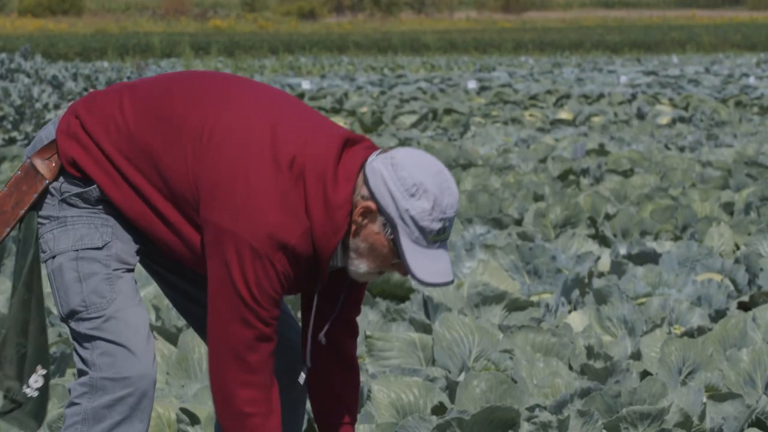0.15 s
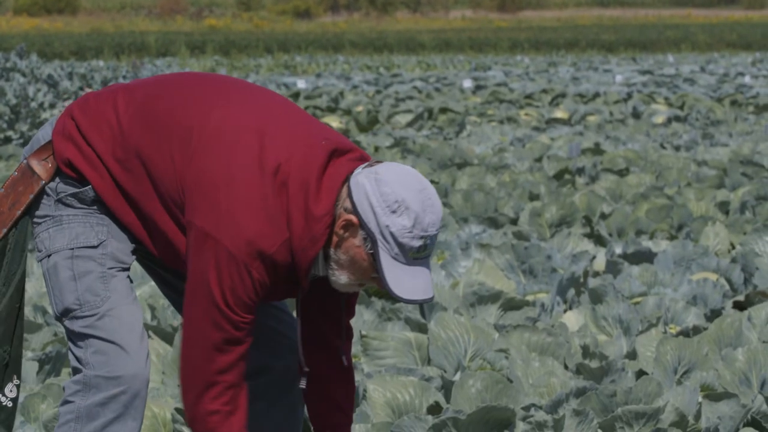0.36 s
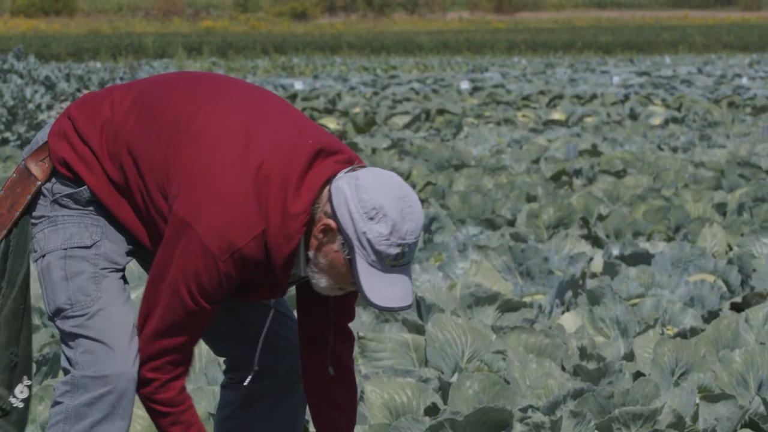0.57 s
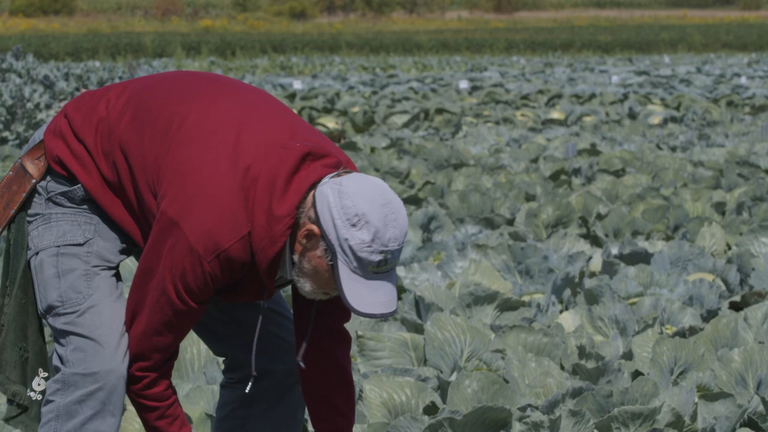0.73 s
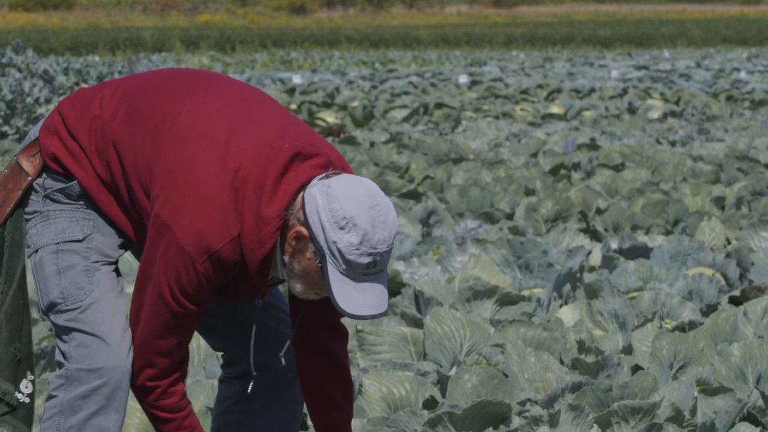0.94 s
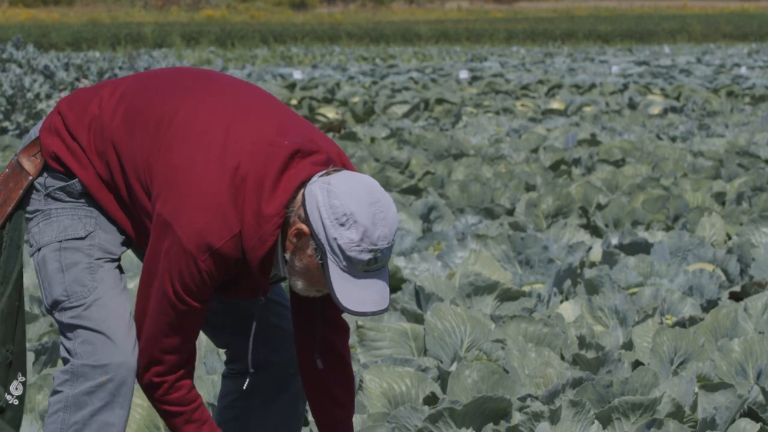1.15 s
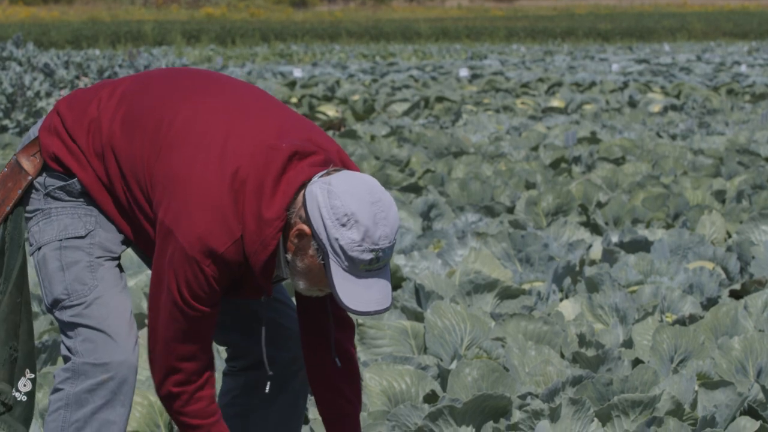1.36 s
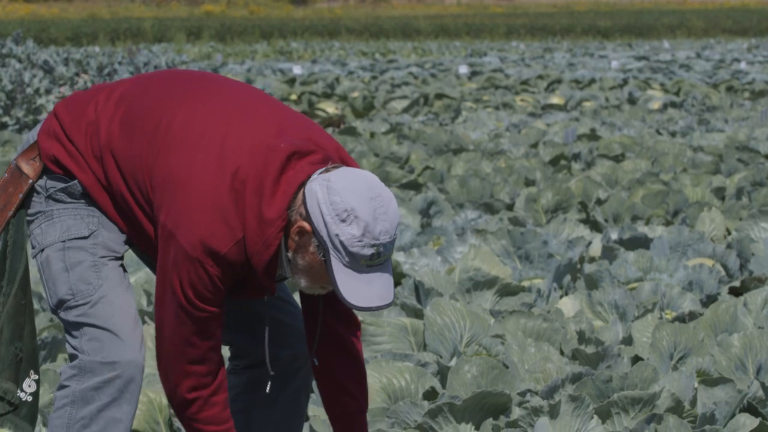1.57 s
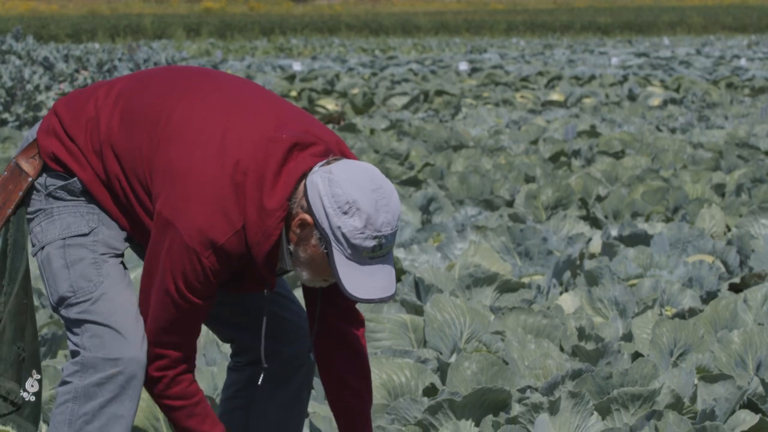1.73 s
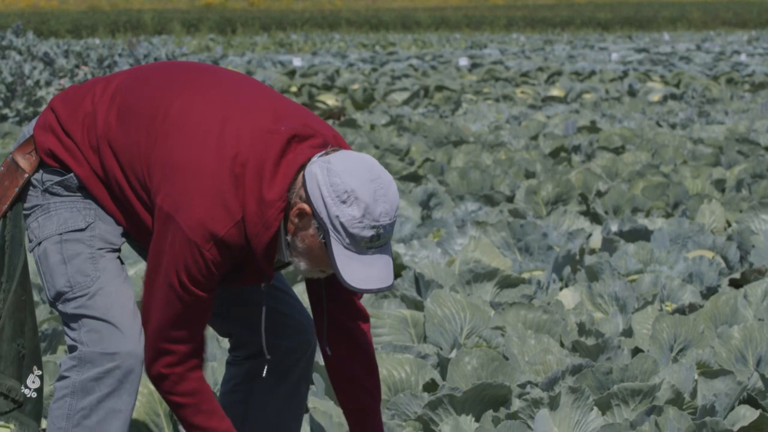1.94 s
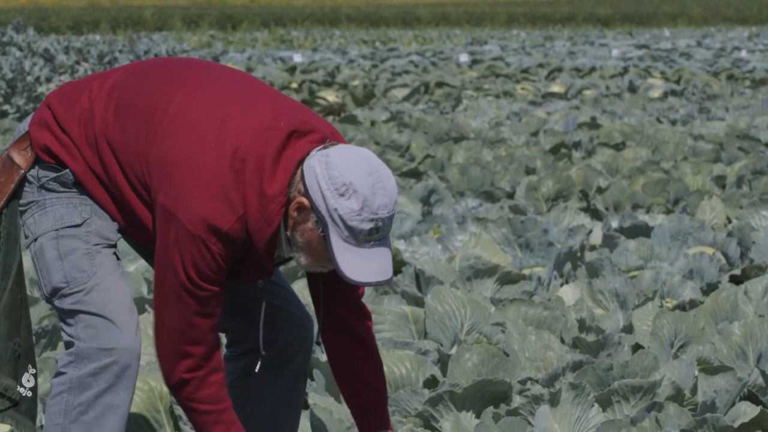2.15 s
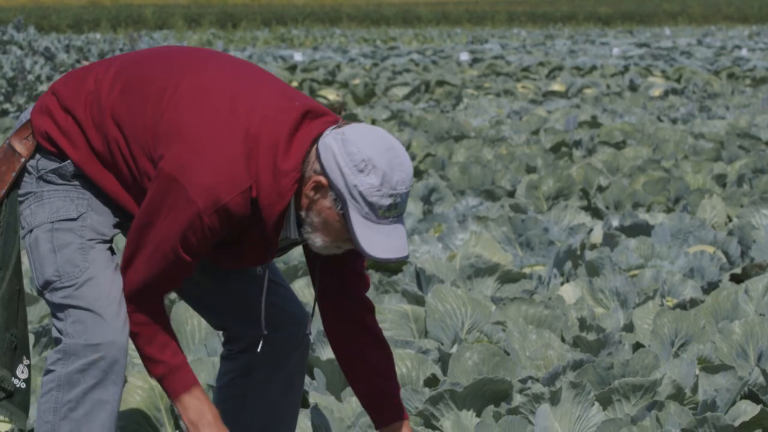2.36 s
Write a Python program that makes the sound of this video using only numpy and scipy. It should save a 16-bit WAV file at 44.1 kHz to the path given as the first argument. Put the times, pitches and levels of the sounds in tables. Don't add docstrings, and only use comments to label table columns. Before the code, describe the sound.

Crisp cabbage leaves crunch and tear, a stalk cracks early, then more sharp leafy snaps follow

```python
import sys
import numpy as np
from scipy import signal
from scipy.fft import rfft, irfft, next_fast_len
from scipy.io import wavfile
from scipy.ndimage import uniform_filter1d

SR = 44100
rng = np.random.default_rng(int(sys.argv[2]) if len(sys.argv) > 2 else 0)


def dump(signal):
    limited = np.clip(np.atleast_2d(signal).T, -1, 1)
    pcm = np.round(limited * 32767).astype(np.int16)
    wavfile.write(sys.argv[1], SR, pcm)


def level_to_linear(level):
    exponent = np.asarray(level, float) / 20
    return 10 ** exponent


N = 105840

# time_s, effort_db, hollow_db, fizz_db
RUB_MOVES = [(0, -56.5, 1.5, -5.5), (.1, -67, 1.5, -24), (0.174, -52.5, 5, -2.5), (.33, -52, 6.5, 0.5),
             (.44, -57, 6, -5), (0.538, -53, -1.5, -8.5), (.595, -59, -3.5, -1.5), (.65, -54.5, -9.5, -9),
             (.84, -58.5, -2, -7), (.92, -78, 4.5, -3), (1.19, -76.5, -1, -5.5), (1.33, -48, -6.5, -7),
             (1.5, -61, -3, -3), (1.66, -52, 0.5, -2), (1.81, -73.5, 6, -6.5), (1.97, -58, -1, -0.5),
             (2.2, -57, 5.5, -2.5), (2.4, -62.5, 4.5, -1.5)]
# start_s, length_s, first_db, last_db, hollow_db
LEAF_TEARS = [(0.11, 0.05, -63, -73, 14.5), (0.176, 0.081, -57, -49.5, 13.5), (0.281, 0.027, -41, -52, 8.5),
              (0.476, 0.087, -55.5, -60, -5), (0.64, 0.018, -53, -53, 0), (0.935, 0.011, -61, -56.5, -9.5),
              (1.001, 0.025, -65.5, -62.5, -19), (1.035, 0.018, -63, -67, -15),
              (1.128, 0.012, -58, -62.5, -2.5), (1.255, 0.055, -56, -56.5, -5),
              (1.313, 0.019, -52.5, -48, -3), (1.334, 0.027, -49, -57, -1), (1.379, .02, -57, -59, -1.5),
              (1.501, 0.057, -59, -51.5, -7.5), (1.558, 0.039, -49, -42.5, 3), (1.6, 0.013, -39, -43.5, 6),
              (1.62, 0.011, -44.5, -42.5, 7), (1.742, 0.032, -52, -59, -3.5), (1.82, 0.045, -49, -42, -4.5),
              (1.853, 0.031, -46, -46, -11), (1.882, 0.039, -49, -54.5, 5), (1.928, 0.029, -51.5, -50, 4.5),
              (1.097, .012, -69, -68, -4), (0.772, 0.029, -62, -59, -3.5),
              (2.087, 0.029, -50.5, -58.5, -13), (2.11, 0.0078, -51, -43.5, -11),
              (2.12, 0.0074, -42.5, -46, -4), (2.144, 0.006, -52, -46, 0), (2.132, 0.0098, -39.5, -41, 6),
              (2.161, 0.052, -48, -65.5, 11.5), (2.22, 0.025, -52, -68, 8)]
# start_s, peak_db, hollow_db, fizz_db, blade_hz
LEAF_SNAPS = [(0.1141, -42, 17.5, 1.5, 2320), (0.1933, -26, 5.5, -0.5, 2300), (0.202, -25, 10.5, -8, 2610),
              (0.2225, -37.5, 12.5, -3, 2320), (.2432, -13.5, 2, -2, 2180), (0.3431, -29, 4, -11, 2350),
              (0.536, -29, -23, -14, 2170), (0.61, -31.5, -5.5, -11, 1730), (0.689, -55, -12, -10, 1720),
              (.7555, -28, -10.5, -8.5, 2000), (0.9358, -34, -13.5, -5, 3450),
              (1.3194, -37.5, -1, -11, 1695), (1.5628, -24.5, -4, -10, 1710), (1.6, -30, 12.5, -4, 2620),
              (1.62, -19.5, -0.5, 5, 2490), (1.754, -30.5, 1.5, -6, 2150), (1.8228, -37, 2.5, -3, 1860),
              (1.8549, -18.5, -13, -14, 1890), (1.8662, -16.5, -5, -3, 1930), (1.8803, -28, 5, 13, 2210),
              (1.9279, -27, -1, -2, 1860), (1.9499, -16.5, -4, 3.5, 2290), (2.1567, -16.5, -1, 0, 1670),
              (2.2231, -35.5, 15.5, 11, 2010),
              (0.388, -41.5, 16, -12, 2290), (0.7074, -45, -15, 4, 2070), (.817, -53, -1.5, -10, 1990),
              (0.9926, -42.5, -16, 1.5, 1705), (1.014, -40.5, -17, 4, 3730), (1.13, -43, -3.5, -11, 1780),
              (1.1814, -44, -15, -10, 1780), (1.4604, -33, -11, -10, 1790), (1.6289, -30, 0, 3, 1880),
              (1.6934, -42, -9, 10.5, 2000), (1.996, -41, 4, 6.5, 2900), (2.0408, -37, -22, -1, 2080),
              (2.112, -23, -5, 5.5, 4550), (2.1346, -27, -17, -10, 1920), (1.149, -46, -5, -3, 2000)]
# start_s, peak_db, hollow_db, fizz_db, blade_hz
MORE_SNAPS = [(.214, -33, 4, -6, 2500), (.293, -26, -8, -4, 2600), (.421, -41, 12, -8, 2300),
              (.83, -45, -5, -6, 2300), (.949, -39, -14.5, -2, 3500), (1.104, -48.5, -7, -8, 1775),
              (1.215, -43.5, -7.5, -9, 1800), (1.276, -37, -3, 1, 1700), (1.336, -28, -5, -6, 1810),
              (1.36, -40, -8, -4, 2000), (1.386, -37, -1, -3, 2060), (1.503, -49, -8, 8, 2000),
              (1.536, -34, -6, 3, 2400), (1.594, -26, -8, 2, 2540), (1.608, -30, 3, 7, 2200),
              (1.674, -38.5, -2, 1, 2000), (1.834, -32.5, -3, 2, 2000), (1.875, -35, -8, 9, 2000),
              (1.912, -34, -4, 6, 2300), (2.094, -32.5, -13, 0, 2000), (2.12, -29.5, -12, 11, 4530),
              (2.136, -22.5, 11.5, 1, 2080), (2.205, -40, 0, 2, 2000), (.318, -42, 7, -6, 2300),
              (.366, -48, 8, -8, 2300), (.455, -44, 6, 2, 2200), (.505, -42, 7, 1, 1900),
              (.575, -44, -4, -3, 2000), (.795, -43, -7, 6, 3450), (.941, -38, -14, 3, 3300),
              (.953, -42, -14, 0, 3650), (1.647, -40, 2, -1, 2000), (1.788, -53, -3, 5, 2000),
              (1.108, -47, -10, -12, 3700)]
# pitch_hz, level_db, t60_s
HEAD_MODES = [(212, -19.5, 0.071), (335, -9, 0.052), (433, -6.5, 0.065), (556, 1, 0.037), (706, -5, 0.039),
              (896, -14.5, 0.041), (1072, -13.5, 0.034), (2000, -16, 0.0051), (2494, -6, 0.02),
              (3300, -3, 0.01), (4300, -9.5, .005)]
# start_s, length_s, pitch_hz, level_db
THIN_TONES = [
    (.665, .032, 6700, -69),
    (.785, .025, 3420, -56),
    (.775, .153, 13400, -78),
    (.865, .066, 6700, -78),
    (.775, .045, 8080, -75),
    (.934, .024, 3480, -59),
    (.936, .025, 13400, -72),
]
# pitch_hz, level_db
FIZZ_COLOUR = [(800, -16), (1400, 6.5), (2500, 3), (5000, -2), (8000, -1.5), (12000, -0.5), (15500, -4.5),
               (16000, -34)]
# pitch_hz, level_db
AIR_COLOUR = [(60, -23.5), (200, -16), (500, -1), (1100, -19), (1900, -9), (3500, -18.5), (13000, -26),
              (16000, -35.5)]

BREAK_LEN = 2048
TICK_S, TICK_RISE_S, SNAP_TICK_S, SNAP_RISE_S = 0.0021, 0.0001, .0015, 0.00066
HOLLOW_HZ, HOLLOW_T60, PUSH_S = (276, 856.6), 0.03, 0.00034
DEEP_HZ, DEEP_DB = 199.5, -10.5
BLADE_HZ, BLADE_T60, EDGE_HZ, EDGE_DB = (1494, 2573), 0.0071, (2960, 4710), -18
SHEEN_HZ, SHEEN_T60, SHEEN_DB = (4500, 13000), .003, -7
CLUMP_DB, CLUMP_S, PATCH_S = 1, .006, .02
RUB_PER_S, RUB_SPREAD_DB, RUB_EVEN_S = 1900, 3.1, .03
TEAR_PER_S, TEAR_SPREAD_DB, TEAR_EVEN_S = 4000, 3.4, .009
TEAR_RISE_S, TEAR_TAIL_S, TEAR_FIZZ_DB = .002, .004, 7
STALK_S, STALK_DB, STALK_RISE_S, HEAD_LEAD_S = .2712, -6.5, 0.00064, .0011
STALK_CRACK_DB, STALK_CRACK_S, STALK_CRACK_RISE_S = -18, 0.0028, 0.0009
STALK_BODY_DB, STALK_BODY_HZ = -11, (700, 4830)
WAVER, FLUTTER_DB, FLUTTER_S = .05, 3, .003
AIR_DB, AIR_SWELL_DB, AIR_SWELL_S = -66.5, 4, 0.022
WIND_HZ, WIND_DB, GUST_DB, GUST_S = (57, 206), -72.5, 3, 0.073
LOW_CUT_HZ, TOP_HZ = 99.6, 15900


def evened(x):
    return x / np.sqrt(np.mean(x ** 2) + 1e-20)


def unit(x):
    return x / np.linalg.norm(x)


def smoothed(x, span):
    return uniform_filter1d(uniform_filter1d(x, span), span)


def slow(s):
    return evened(smoothed(rng.standard_normal(N), round(s * SR)))


def add(mix, s, sound):
    part = mix[..., round(s * SR):][..., :sound.shape[-1]]
    part += sound[..., :part.shape[-1]]


def coloured(x, points):
    f, level = np.transpose(points)
    hz = np.fft.rfftfreq(len(x), 1 / SR)
    gain = level_to_linear(np.interp(np.log(hz + 1), np.log(f), level))
    return irfft(rfft(x) * gain, len(x))


def between(edges, v):
    return edges[0] * (edges[1] / edges[0]) ** v


def ring(hz, t60, t):
    return np.sin(2 * np.pi * hz * t) * level_to_linear(-60 * t / t60)


def struck(body, blow):
    return unit(signal.fftconvolve(blow, np.diff(body, prepend=0))[:BREAK_LEN])


def leaf_break(tick_s, rise_s, blade_hz=None):
    t, u = np.arange(BREAK_LEN) / SR, rng.random(12)
    decay_s = tick_s * (1.01 + 0.76 * u[0])
    puff = rng.standard_normal(BREAK_LEN) * (1 - np.exp(-t / rise_s)) * np.exp(-t / decay_s)

    hollow = sum((-1) ** k * ring(between(HOLLOW_HZ, (k + u[8 + k]) / 4), HOLLOW_T60, t) for k in range(4))
    hollow = hollow + level_to_linear(DEEP_DB) * ring(DEEP_HZ * (.8 + 0.44 * u[1]), HOLLOW_T60 * 2, t)
    push = np.sign(u[7] - .5) * t * np.exp(-t / PUSH_S)

    blade = ring(blade_hz or between(BLADE_HZ, u[3]), BLADE_T60, t)
    blade = blade - .5 * ring(between(BLADE_HZ, u[4]), BLADE_T60, t)
    blade = blade + level_to_linear(EDGE_DB) * ring(between(EDGE_HZ, u[5]), BLADE_T60, t)

    sheen = struck(ring(between(SHEEN_HZ, u[6]), SHEEN_T60, t), puff)
    fizz = unit(unit(puff) + level_to_linear(SHEEN_DB) * sheen)
    return np.array([struck(hollow, unit(push) + unit(puff)), struck(blade, puff), fizz])


def crackle(per_s, spread_db, even_s, count=30):
    size = level_to_linear(spread_db * np.minimum(rng.exponential(1, N), 4))
    size = size * (rng.random(N) < per_s / SR)
    size = size * level_to_linear(CLUMP_DB * slow(CLUMP_S))
    pace = smoothed(size ** 2, round(even_s * SR))
    size = size / np.sqrt(abs(pace) + 1e-4)
    moved = (np.arange(N) / SR / PATCH_S).astype(int)
    patch = (rng.integers(0, 9, N) + moved) % count
    return [(size * (patch == k), leaf_break(TICK_S, TICK_RISE_S)) for k in range(count)]


def sounded(patches, gains):
    size = next_fast_len(N + BREAK_LEN)
    total = sum(rfft(train * gains, size) * rfft(shape, size) for train, shape in patches)
    return irfft(total, size)[:, :N]


def rub_gains():
    times, *columns = np.transpose(RUB_MOVES)
    effort, hollow, fizz = [np.interp(np.arange(N) / SR, times, c) for c in columns]
    return level_to_linear([effort + hollow, effort, effort + fizz])


def rubbing():
    return sounded(crackle(RUB_PER_S, RUB_SPREAD_DB, RUB_EVEN_S), rub_gains())


def field_air():
    hiss = evened(coloured(rng.standard_normal(N), AIR_COLOUR))
    return hiss * level_to_linear(AIR_DB + AIR_SWELL_DB * slow(AIR_SWELL_S))


def wind():
    band = signal.butter(2, WIND_HZ, "band", fs=SR, output="sos")
    low = signal.sosfilt(band, rng.standard_normal(N))
    return evened(low) * level_to_linear(WIND_DB + GUST_DB * slow(GUST_S))


def tears():
    gains = np.zeros((3, N))
    for start, length, first_db, last_db, hollow_db in LEAF_TEARS:
        t = np.arange(0, length + .03, 1 / SR)
        shape = np.minimum(t / TEAR_RISE_S, 1) * np.exp(-np.maximum(t - length, 0) / TEAR_TAIL_S)
        shape = shape * level_to_linear(first_db + (last_db - first_db) * t / length)
        add(gains, start, shape * level_to_linear([[hollow_db], [0], [0]]))
    rub = rub_gains()
    gains[2] *= rub[2] / rub[1] * level_to_linear(TEAR_FIZZ_DB)
    return sounded(crackle(TEAR_PER_S, TEAR_SPREAD_DB, TEAR_EVEN_S), gains)


def snaps(rows):
    out = np.zeros((3, N))
    for s, peak_db, hollow_db, fizz_db, hz in rows:
        layers = leaf_break(SNAP_TICK_S, SNAP_RISE_S, hz) * level_to_linear([[hollow_db], [0], [fizz_db]])
        add(out, s, layers * level_to_linear(peak_db + 7))
    return out


def stalk():
    t, out = np.arange(6000) / SR, np.zeros((3, N))
    head = sum((-1) ** k * level_to_linear(db) * ring(hz, t60, t + HEAD_LEAD_S)
               for k, (hz, db, t60) in enumerate(HEAD_MODES))
    head = head * (1 - np.exp(-t / STALK_RISE_S))
    crack = rng.standard_normal(len(t)) * np.exp(-t / STALK_CRACK_S)
    crack = crack * np.minimum(t / STALK_CRACK_RISE_S, 1)
    body = signal.lfilter(*signal.butter(1, STALK_BODY_HZ, "band", fs=SR), crack)
    layers = [level_to_linear(STALK_DB) * head, level_to_linear(STALK_BODY_DB) * body, level_to_linear(STALK_CRACK_DB) * crack]
    add(out, STALK_S, np.array(layers))
    return out


def thin_tones():
    out, flutter = np.zeros(N), level_to_linear(FLUTTER_DB * slow(FLUTTER_S))
    for start, length, hz, db in THIN_TONES:
        t = np.arange(0, length, 1 / SR)
        waver = WAVER * uniform_filter1d(rng.standard_normal(len(t)), 150)
        phase = 2 * np.pi * np.cumsum(hz * (1 + waver)) / SR
        swell = np.sin(np.pi * t / length) ** 0.4
        add(out, start, level_to_linear(db) * np.sqrt(2) * swell * np.sin(phase))
    return out * flutter


def scene():
    background = field_air() + wind()
    leaves = rubbing() + tears() + snaps(LEAF_SNAPS) + snaps(MORE_SNAPS) + stalk()
    hollow, blade, fizz = leaves
    return (hollow + blade + coloured(fizz, FIZZ_COLOUR) + thin_tones() + background)[None]


def band_limit(x):
    return signal.sosfilt(signal.butter(12, 16620, fs=SR, output="sos"), x)


def record(dry):
    low_cut = signal.butter(4, LOW_CUT_HZ, "high", fs=SR, output="sos")
    top_cut = signal.firwin(255, TOP_HZ, window=("kaiser", 5), fs=SR)
    mix = signal.oaconvolve(signal.sosfilt(low_cut, dry), top_cut[None], "same")
    return band_limit(mix)


dry = scene()
out = record(dry)
dump(out)
```